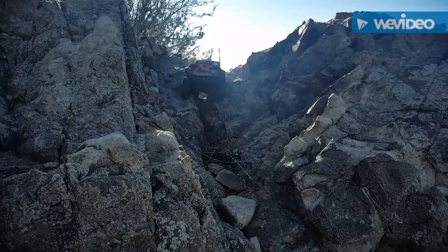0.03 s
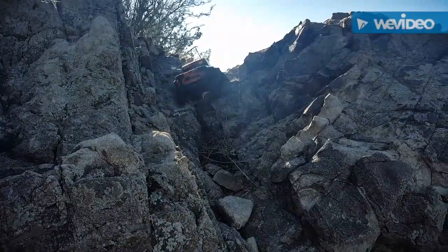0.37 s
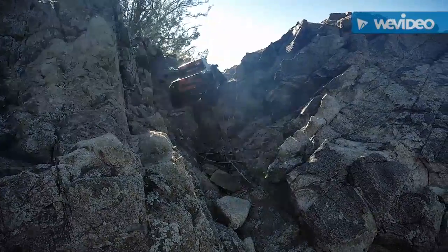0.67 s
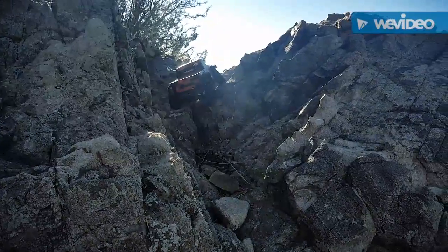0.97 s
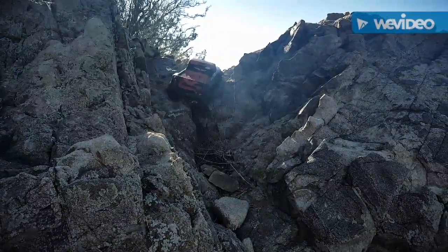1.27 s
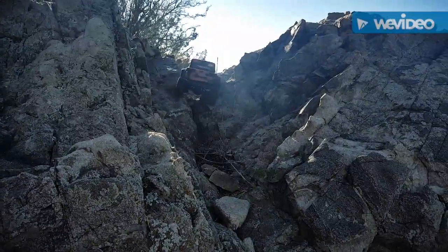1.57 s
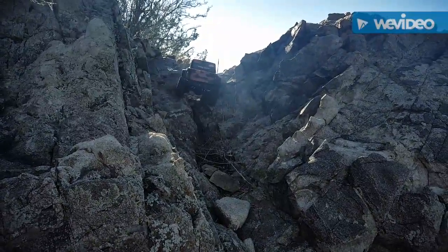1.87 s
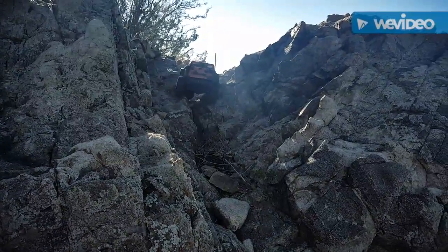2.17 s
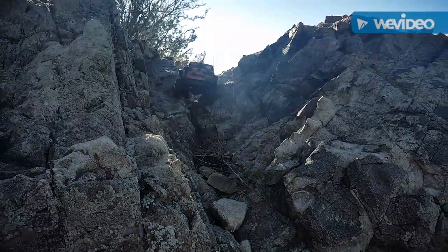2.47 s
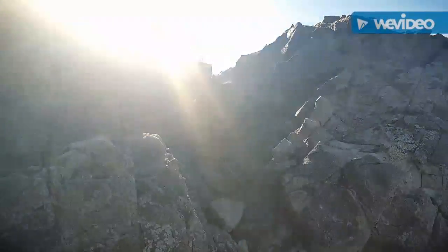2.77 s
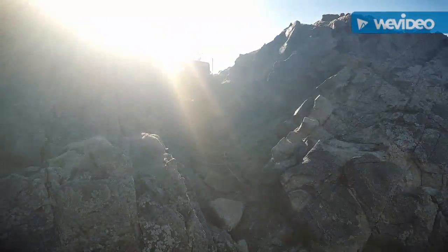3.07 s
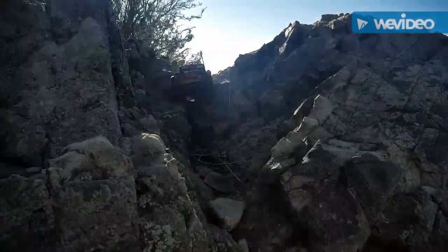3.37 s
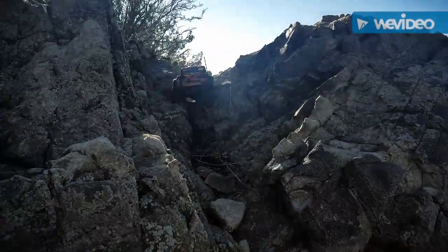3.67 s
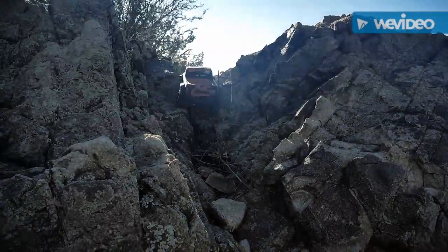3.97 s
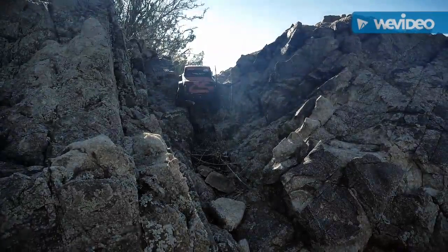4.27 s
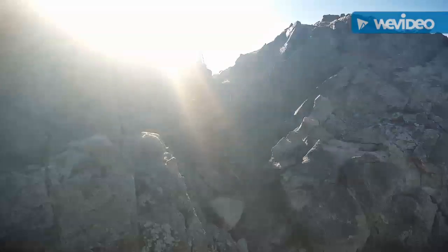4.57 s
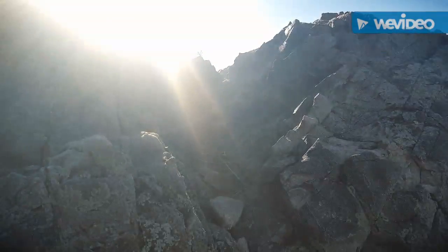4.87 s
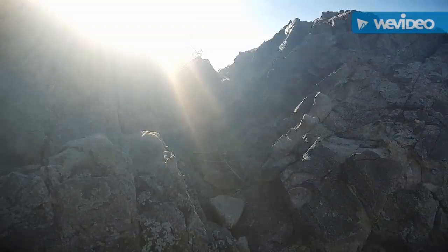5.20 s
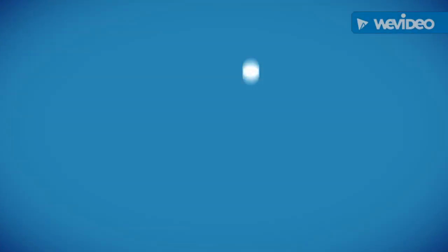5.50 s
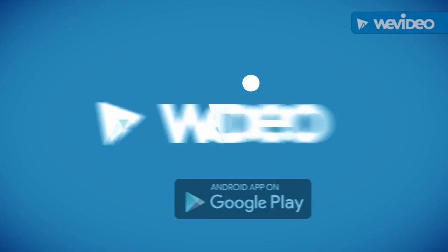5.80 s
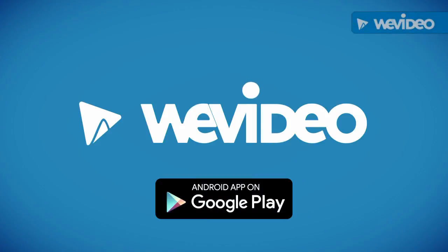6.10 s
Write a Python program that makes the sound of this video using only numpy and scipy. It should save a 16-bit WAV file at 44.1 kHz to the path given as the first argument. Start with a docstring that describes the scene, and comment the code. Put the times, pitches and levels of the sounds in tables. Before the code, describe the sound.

A small electric model truck crawls up a rocky gully in short throttle bursts. Its gears whine and rattle with a wavering pitch, then wind down between pushes. The tyres scrabble on stone, grit snaps, and the hollow wheels and plastic shell knock against rock in clusters. A faint high whistle and light wind lie underneath, until everything cuts off abruptly.

```python
"""A small electric model truck crawls up a rocky gully in short throttle bursts, in a light wind.
First the steering servo chatters faintly and grit snaps under the tyres. The speed controller whistles
at low throttle, then the gears whine and rattle with the wavering motor speed. The tyres scrabble on
stone, the hollow wheels and shell knock and boom, and the rotor whines down as it coasts.
Burst follows burst until the sound stops dead at about 5.5 s."""
import sys
import numpy as np
from scipy import signal
from scipy.fft import rfft, irfft, next_fast_len
from scipy.io import wavfile

SR = 44100
rng = np.random.default_rng(int(sys.argv[2]) if len(sys.argv) > 2 else 0)


def wav_out(sig):
    """Save sig, one row per channel (or a flat mono array), as 16-bit PCM at SR to the path in sys.argv[1]."""
    wavfile.write(sys.argv[1], SR, np.round(np.clip(np.atleast_2d(sig).T, -1, 1) * 32767).astype(np.int16))


N = 270754
TIME = np.arange(N) / SR
FULL_SPEED_HZ, CUTOFF_HZ, STOP_S = 2200, 15500, 5.479


def from_db(db):
    """Decibels to gain."""
    return 10 ** (np.asarray(db) / 20)

def rms_one(x):
    """Scale to rms 1."""
    return x / np.sqrt(np.mean(x ** 2) + 1e-20)

def drift(hz):
    """Smooth random wobble, rms 1."""
    r = np.exp(-2 * np.pi * hz / SR)
    return rms_one(signal.lfilter([1], [1, -2 * r, r * r], rng.standard_normal(N + SR))[SR:])

def grains(per_s, spread_db):
    """Random tiny impacts of uneven size, rms 1."""
    sizes = from_db(spread_db * np.clip(rng.standard_normal(N), -2, 2)) * rng.choice([-1, 1], N)
    return rms_one(sizes * (rng.random(N) < per_s / SR))

def blows(table, column, t60, snap, squash_s):
    """Each blow is a sharp contact, then a shower of small ones that builds as it squashes and dies."""
    out, t = np.zeros(N + SR), TIME[:SR // 4]
    for row in table:
        shower = rng.standard_normal(len(t)) * from_db(-60 * t / t60) * (1 - np.exp(-t / squash_s))
        shower[0] = snap
        at = round(row[0] * SR)
        out[at:at + len(t)] += from_db(row[column]) * shower
    return out[:N]

def colour(x, curve):
    """Minimum-phase EQ along this curve; white noise keeps its power."""
    size = 2 * next_fast_len(N // 2 + SR // 4)
    hz, db = np.transpose(curve)
    bin_hz = np.arange(size // 2 + 1) * SR / size
    gain = rms_one(from_db(np.interp(np.log(bin_hz + 1), np.log(hz), db)))
    cepstrum = irfft(np.log(gain))
    cepstrum[1:size // 2] *= 2
    cepstrum[size // 2 + 1:] = 0
    return irfft(rfft(x, size) * np.exp(rfft(cepstrum)))[:N]

def resonate(force, modes):
    """A struck object rings in its modes; white noise keeps its power."""
    t = TIME[:SR // 2]
    ring = sum((-1) ** k * from_db(db - 60 * t / t60) * np.sin(2 * np.pi * hz * t)
               for k, (hz, db, t60) in enumerate(modes))
    return signal.fftconvolve(force, ring / np.linalg.norm(ring))[:N]

def soften(x, hz):
    """Gentle one-pole low-pass."""
    return signal.sosfilt(signal.butter(1, hz, fs=SR, output="sos"), x)

def scatter(x, echo_db, t60, wall_hz):
    """Hard surfaces send back a dense, dying spray of echoes."""
    t = TIME[:SR // 2]
    echoes = rng.standard_normal(len(t)) * (t > .001) * from_db(-60 * t / t60)
    echoes = soften(echoes / np.linalg.norm(echoes), wall_hz)
    return x + from_db(echo_db) * signal.fftconvolve(x, echoes)[:N]

def gate(start, end, attack_s, release_db_per_s):
    """Swell in, hold, die away."""
    swell = .5 + .5 * np.tanh(2 * (TIME - start) / attack_s - 1)
    return swell * from_db(-release_db_per_s * np.maximum(TIME - end, 0))

def envelopes(cues, attack_s, release_db_per_s, column=2):
    """One gate per cue, at the level in the given column."""
    return [from_db(cue[column]) * gate(cue[0], cue[1], attack_s, release_db_per_s) for cue in cues]

def throttle(on, off, attack_s):
    """Torque on the drive during one burst, 0-1."""
    return gate(on, off, attack_s, release_db_per_s=170.5)

def with_speed(tooth_hz, db_per_octave):
    """Gain that grows with the tooth rate; 1 at full speed."""
    return from_db(db_per_octave * np.log2(tooth_hz / FULL_SPEED_HZ))


# EQ of the wind rumble and of the air hiss: freq_hz, gain_db
WIND_EQ = [(20, -52), (45, -9.5), (85, -0.5), (125, -2), (200, -13.5), (400, -20.5), (1000, -50.5)]
AIR_EQ = [(15, -20.5), (25, -3.5), (146, -7.5), (344, -35), (673, -19.5), (811, -31.5), (1310, -37.5),
          (2130, -32.5), (3010, -40), (3440, -29.5), (5880, -28.5), (10900, -55), (15000, -43)]

def outdoors(wind_db=-60, gust_db=0.5, air_db=-77.5):
    """A bed of light, rumbling wind and faint open-air hiss."""
    wind = from_db(wind_db + gust_db * drift(3)) * colour(rng.standard_normal(N), WIND_EQ)
    return wind + from_db(air_db) * colour(rng.standard_normal(N), AIR_EQ)


# the steering servo holds its load: start_s, end_s, level_db
SERVO_HOLDS = [(-.04, 0.118, -71.5), (4.21, 4.388, -76), (5.075, 5.317, -70), (5.318, 5.48, -58.5)]
# EQ of its chatter: freq_hz, gain_db
SERVO_EQ = [(600, -31.5), (1200, 1.5), (1700, -14), (2300, -4), (2900, -7), (3400, -13), (4300, -15.5),
            (6000, -16.5), (15000, -45)]

def servo():
    """Tiny gears chatter faintly while the wheels are held on lock."""
    level = sum(envelopes(SERVO_HOLDS, attack_s=.044, release_db_per_s=159.5))
    return level * colour(grains(2500, spread_db=2), SERVO_EQ)


# the tyres slide off a ledge: start_s, end_s, scrabble_db, groan_db
SLIDES = [(-.02, 0.03, -54.5, -74), (0.423, .485, -44, -40.5), (0.485, 0.536, -36, -33.5),
          (0.548, 0.603, -40, -53), (1.1, 1.25, -38.5, -34.5), (2.1, 2.23, -42.5, -62),
          (2.83, 2.863, -42, -62), (3.405, 3.514, -40.5, -54), (3.53, 3.605, -52.5, -66),
          (3.995, 4.1, -40, -58), (4.13, 4.19, -44, -61), (4.19, 4.206, -46, -49.5),
          (4.818, 4.879, -40, -58), (4.918, 4.96, -35, -43), (4.975, 5.028, -36, -45),
          (5.391, 5.452, -47, -50)]
# EQ of tread on stone: freq_hz, gain_db
TYRE_EQ = [(40, -33), (110, -5), (170, 2), (240, 3.5), (420, 1.5), (540, -4.5), (660, 5), (800, 0.5),
           (1200, -12), (1600, -14), (2600, -18.5), (5000, -44.5), (15000, -67.5)]
# ring of the hollow wheels and shell, shared with the knocks: pitch_hz, level_db, t60_s
BODY_MODES = [(264.3, -9.5, 0.068), (303, -3, 0.093), (352, -6.5, 0.14), (381.5, -5.5, 0.16),
              (429.5, -2, 0.11), (477, -8.5, 0.14), (510.3, -2.5, .18), (544.2, -.5, 0.18),
              (617, -10, 0.12), (758.5, -3, 0.13), (789, -10, 0.068), (1041, -14.5, 0.13), (1277, -12, .08),
              (1734, -11.5, 0.097)]

def tyres(tooth_hz, scrub_db=-4.5, hollow_db=-14, creep_db=-72, lumpy_db=2, lag_s=.052):
    """Tread catches and slips on stone, stirring the hollow wheels; in a slide the rubber judders."""
    driven = [from_db(scrabble_db) * gate(on + lag_s, off, attack_s=.069, release_db_per_s=115)
              for on, off, *_, scrabble_db, _, _ in BURSTS]
    rolling = (np.max(driven, axis=0) + from_db(creep_db)) * with_speed(tooth_hz, db_per_octave=1)
    sliding = np.max(envelopes(SLIDES, attack_s=.02, release_db_per_s=218.5), axis=0)
    groan = np.max(envelopes(SLIDES, attack_s=.02, release_db_per_s=202.5, column=3), axis=0)
    slips = np.hypot(rolling, sliding) * from_db(lumpy_db * drift(25)) * grains(1800, spread_db=5.5)
    judder = groan * grains(900, spread_db=2)
    hollow = resonate(from_db(hollow_db) * slips + judder, BODY_MODES)
    return from_db(scrub_db) * colour(slips, TYRE_EQ) + hollow


# snaps of grit: start_s, level_db
GRIT_SNAPS = [(.0194, -51.5), (.0816, -51), (.378, -25.5), (.824, -57), (.9168, -58), (2.8524, -27.5),
              (2.9624, -32), (3.0143, -37), (3.1097, -52), (3.228, -45), (3.4225, -31.5), (3.5154, -44),
              (3.5806, -45.5), (3.6667, -55.5), (4.0864, -40), (4.138, -50), (4.6215, -26)]
# their bright EQ: freq_hz, gain_db
GRIT_EQ = [(800, -17), (2000, -1), (3300, 1.5), (6300, 1.5), (9500, -11), (12500, -4.5), (16000, -9)]

def grit(trim_db=-8):
    """Grit snaps under the tyres in small, crisp ticks."""
    snaps = blows(GRIT_SNAPS, column=1, t60=.034, snap=3.4, squash_s=.0008)
    return from_db(trim_db) * colour(snaps, GRIT_EQ)


# the speed controller at low throttle: start_s, end_s, level_db
WHISTLES = [(0.112, .15, -69), (.66, 0.804, -81), (0.996, 1.08, -74), (1.616, 1.85, -68.5),
            (2.494, 2.709, -69.5), (3.17, 3.22, -69.5), (3.745, 3.83, -71.5), (4.396, 4.47, -65.5),
            (5.221, 5.33, -76), (5.327, 5.483, -73)]

def controller(switch_hz=5959, octave_db=-15, waver_db=4):
    """The switched motor current makes the windings whistle."""
    phase = 2 * np.pi * switch_hz * TIME
    level = sum(envelopes(WHISTLES, attack_s=.015, release_db_per_s=164.5))
    whistle = np.sin(phase) + from_db(octave_db) * np.sin(2 * phase)
    return level * from_db(waver_db * drift(16)) * whistle


# motor speed before surges, one curve per run-up and spin-down: time_s, tooth_rate_hz
SPEED_CURVES = [
    [(.1, 500), (.14, 950), (.18, 1762), (.24, 2030), (.277, 1359), (.32, 1554), (.345, 1454), (.375, 2025),
     (.43, 2057), (.46, 1568), (.63, 1036), (.8, 503)],
    [(1.0, 612), (1.09, 1041), (1.13, 1820), (1.24, 2260), (1.29, 1900), (1.38, 2340), (1.46, 2005),
     (1.5, 1348), (1.56, 1540), (1.65, 1068), (1.72, 819)],
    [(1.83, 830), (1.89, 1644), (1.94, 2134), (2.04, 2360), (2.2, 2020), (2.3, 2263), (2.39, 2179),
     (2.46, 1681), (2.5, 960), (2.58, 850)],
    [(2.69, 807), (2.75, 1700), (2.8, 2179), (2.945, 2360), (2.995, 1264), (3.08, 600), (3.135, 959.6),
     (3.155, 866.4), (3.175, 940.4)],
    [(3.21, 823), (3.26, 1793), (3.325, 1790), (3.365, 1248), (3.45, 1004), (3.6, 384)],
    [(3.78, 504), (3.83, 1413), (3.855, 1498), (3.89, 1330), (3.945, 1391), (4.0, 1009), (4.3, 404)],
    [(4.42, 756), (4.48, 1616), (4.545, 1506), (4.65, 2160), (4.72, 2200), (4.775, 2500), (4.87, 1970),
     (4.95, 904), (5.15, 621)],
    [(5.32, 810), (5.35, 1254), (5.48, 1146)],
]
# throttle bursts, also driving gears and tyres:
# start_s, end_s, attack_s, gear_load_db, whine_over_rattle_db, scrabble_db, surge_peak_s, surge_depth
BURSTS = [(.143, 0.531, 0.0096, -41.5, 1, -45, 0.35, 0.04),
          (1.054, 1.648, 0.034, -42.5, -2, -41, 1.23, 0.02),
          (1.676, 1.88, 0.016, -46, -5.5, -48, 1.64, 0.01), (1.835, 2.486, .03, -42, 1.5, -45, 2.142, .07),
          (2.597, 2.974, 0.045, -41.5, 0, -41, 3.25, 0.05),
          (3.201, 3.46, 0.049, -42.5, -1, -41.5, 3.95, 0.06),
          (3.807, 3.954, 0.041, -42, 0, -42.5, 3.945, .15), (4.413, 4.9, 0.056, -42.5, 2, -40, 4.57, .04),
          (5.305, 5.482, 0.041, -58, -9, -52, 5.5, 0)]

def tooth_rate(teeth_per_turn=113):
    """The drive shaft binds once a turn, so under torque the motor's speed surges and sags."""
    points = [point for curve in SPEED_CURVES for point in curve]
    base_hz = np.interp(TIME, *np.transpose(points))
    turns = np.cumsum(base_hz) / SR / teeth_per_turn
    surge = 0
    for on, off, attack, *_, peak_s, depth in BURSTS:
        shaft_angle = 2 * np.pi * (turns - np.interp(peak_s, TIME, turns))
        surge += depth * throttle(on, off, attack) * np.cos(shaft_angle)
    return base_hz * (1 + surge)


# harmonics of the gear whine: tooth_rate_multiple, level_db
WHINE_HARMONICS = [(1, 1.5), (2, -0.5), (3, 2), (4, -3), (5, -6), (7, -5)]

def gear_whine(tooth_hz, between_db=-13, between_slope_db=-5.7):
    """Tooth-rate harmonics, with weaker partials between them from uneven teeth; each comes and goes."""
    phase = 2 * np.pi * np.cumsum(tooth_hz * (1 + .04 * drift(150))) / SR
    whine = 0
    for thirds in range(3, 22):
        multiple = thirds / 3
        level_db = np.interp(multiple, *np.transpose(WHINE_HARMONICS))
        if thirds % 3:
            level_db += between_db + between_slope_db * multiple
        swell_db = 7 * np.tanh(drift(55))
        partial = np.sin(multiple * phase + rng.uniform(0, 2 * np.pi))
        whine += from_db(level_db + swell_db) * partial * (multiple * tooth_hz < CUTOFF_HZ)
    return rms_one(whine)


# EQ of the gearbox walls and of the axle rumble: freq_hz, gain_db
GEARBOX_EQ = [(600, -7.5), (1170, 5.5), (1550, 0.5), (2350, -1), (2950, 11.5), (3270, -2), (3600, 0.5),
              (4750, -2), (5600, -5.5), (6250, 3), (7400, 1), (10000, -5.5), (12500, 1), (15500, -6.5)]
AXLE_EQ = [(60, -33.5), (120, -8.5), (175, -1), (240, -13), (500, -12.5), (1500, -36.5)]
# ring of the plastic gearbox: pitch_hz, level_db, t60_s
GEARBOX_MODES = [(1162, 8, 0.02), (1297, -2.5, 0.052), (2000, -11, 0.017), (2270, -1, 0.0074),
                 (2766, 1.5, 0.0077), (2907, 4, 0.0037), (4844, -0.5, 0.019), (5094, -7, 0.057),
                 (5615, -0.5, .02), (6080, -3, 0.031), (7584, -13.5, 0.01), (7445, -2.5, 0.032),
                 (9020, -0.5, 0.0042)]

def gears(tooth_hz, whine_db=-2, rattle_db=-2.5, idle_db=-45, box_db=-6, axle_db=-6.5, hard_hz=1950):
    """Teeth mesh in a whine and rattle in their play; both shake the gearbox, and the axles rumble."""
    rattle = grains(5000, spread_db=3.5) * from_db(rattle_db + 3.37 * drift(70))
    # teeth pressed together sing, unloaded ones only rattle
    sing = sum(from_db(db) * throttle(on, off, attack) for on, off, attack, _, db, *_ in BURSTS)
    contact = (from_db(whine_db) * sing * gear_whine(tooth_hz) + rattle) / np.sqrt(1 + sing ** 2)
    torques = [from_db(db) * throttle(on, off, attack) for on, off, attack, db, *_ in BURSTS]
    driven = np.max(torques, axis=0) * with_speed(tooth_hz, db_per_octave=7)
    idle = from_db(idle_db) * with_speed(tooth_hz, db_per_octave=19)
    load = np.maximum(driven, idle) * from_db(1.03 * drift(25))
    # slow teeth meet softly and lose their top
    hardness = np.clip(tooth_hz / hard_hz, 0, 1) ** 3
    force = load * (hardness * contact + 1.68 * (1 - hardness) * soften(contact, hz=5800))
    rumble = from_db(axle_db) * colour(load * hardness * rng.standard_normal(N), AXLE_EQ)
    # echoes inside the shell smear the gliding partials
    walls = scatter(colour(force, GEARBOX_EQ), echo_db=-3, t60=.035, wall_hz=15000)
    return from_db(box_db) * (walls + resonate(force, GEARBOX_MODES)) + rumble


# wheels and chassis hit rock: start_s, thud_db, crack_db, boom_db
KNOCKS = [(.487, -16.5, -31.5, -18.5), (.498, -21, -30, -19.5), (.506, -18, -50, -23),
          (.529, -28.5, -39.5, -38), (.565, -29.5, -46, -33.5), (.709, -104, -60, -69),
          (1.134, -26, -41, -60), (1.182, -36.5, -40, -37), (1.201, -19.5, -33, -23.5),
          (1.222, -18, -27.5, -27), (1.245, -18.5, -30.5, -26.5), (1.278, -20.5, -39, -30),
          (1.397, -22.5, -56, -56), (1.572, -15.5, -35, -29.5), (2.115, -35.5, -68, -39),
          (2.71, -26, -46, -55), (2.821, -21.5, -50, -37), (2.852, -21, -58, -48), (3.014, -38, -49, -61),
          (3.414, -24, -45, -27), (3.442, -12, -32.5, -24.5), (3.463, -19.5, -37.5, -57),
          (3.483, -25.5, -53, -34.5), (3.498, -31, -41.5, -53), (3.552, -35.5, -51, -79),
          (3.996, -28.5, -43.5, -42), (4.058, -26, -52, -46), (4.088, -26, -42.5, -31.5),
          (4.187, -19.5, -47.5, -33), (4.214, -25, -78, -28.5), (4.506, -26.5, -62, -28),
          (4.82, -30, -36.5, -39), (4.849, -24, -35.5, -37), (4.92, -20, -48, -28),
          (4.941, -22, -37.5, -30), (4.97, -22, -39.5, -28.5), (4.999, -18, -43, -42),
          (5.008, -27, -37.5, -39), (5.019, -19.5, -38, -31.5), (5.053, -30, -44, -37.5),
          (5.079, -36, -49, -44.5)]
# EQ of the thud and of the crack: freq_hz, gain_db
THUD_EQ = [(35, -29), (70, -10.5), (110, 2.5), (330, 0.5), (550, -1), (780, 9.5), (1000, -1), (1300, -3),
           (1700, -15), (2900, -17), (4000, -27), (15000, -63)]
CRACK_EQ = [(500, 1), (1500, -2), (2900, 6.5), (3400, 1), (4500, -1.5), (6300, -3.5), (9500, -15.5),
            (12500, -16), (16000, -18.5)]

def knocks(thud_db=-11.5, crack_db=-2.5, boom_db=4):
    """Each hit layers a dull chassis thud, a crack of plastic on stone and the boom of the wheels."""
    thud = colour(blows(KNOCKS, column=1, t60=.1, snap=5.5, squash_s=.0016), THUD_EQ)
    crack = colour(blows(KNOCKS, column=2, t60=.077, snap=3.3, squash_s=.0006), CRACK_EQ)
    boom = resonate(blows(KNOCKS, column=3, t60=.028, snap=4, squash_s=.00097), BODY_MODES)
    return from_db(thud_db) * thud + from_db(crack_db) * crack + from_db(boom_db) * boom


# the rotor's own whine, bare while it coasts: start_s, end_s, level_db
COASTS = [(0.598, 0.674, -70), (1.573, 1.644, -63), (2.45, 2.548, -62), (3.11, 3.18, -74)]

def rotor(tooth_hz, lower_db=-7, octave_db=-13):
    """A few rough, high partials of the spinning rotor glide with its speed."""
    phase = 2 * np.pi * np.cumsum(tooth_hz * (1 + .022 * drift(150))) / SR
    octave = from_db(octave_db) * (12 * tooth_hz < CUTOFF_HZ) * np.sin(12 * phase)
    whine = np.sin(6 * phase) + from_db(lower_db) * np.sin(5 * phase) + octave
    level = sum(envelopes(COASTS, attack_s=.041, release_db_per_s=172))
    return level * from_db(2 * drift(50)) * whine


def scene():
    """The truck echoes between rock faces in open air; motor speed drives gears, rotor and tyres."""
    tooth_hz = tooth_rate()
    truck = gears(tooth_hz) + rotor(tooth_hz) + servo() + tyres(tooth_hz) + knocks() + grit()
    in_gully = scatter(truck, echo_db=-9, t60=.049, wall_hz=4000)
    return (in_gully + controller() + outdoors())[None]

def record(dry):
    """A hard cut to silence near the end, and a steep low-pass on the top."""
    stopped = dry * np.clip((STOP_S - TIME) * SR / 64, 0, 1) + 1e-18
    return signal.sosfilt(signal.ellip(10, .1, 80, CUTOFF_HZ, fs=SR, output="sos"), stopped)


dry = scene()
out = record(dry)
wav_out(out)
```